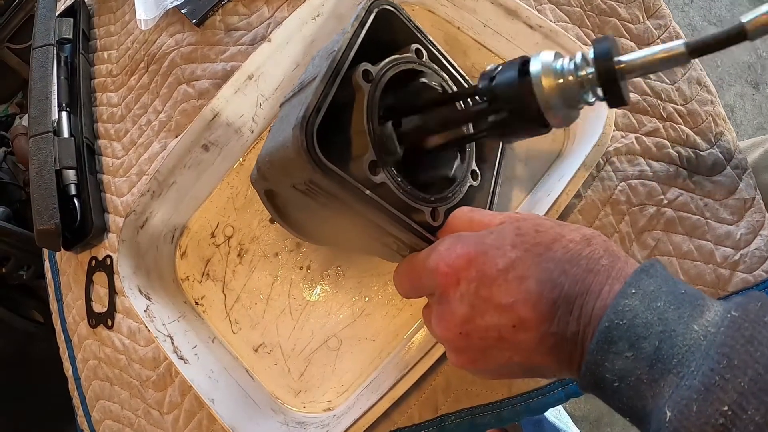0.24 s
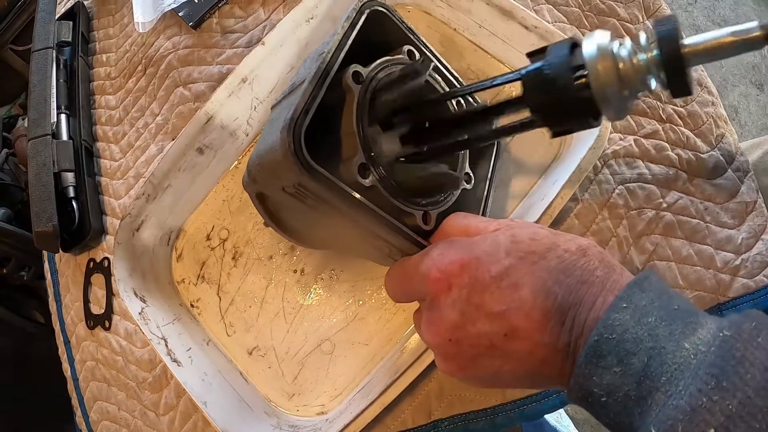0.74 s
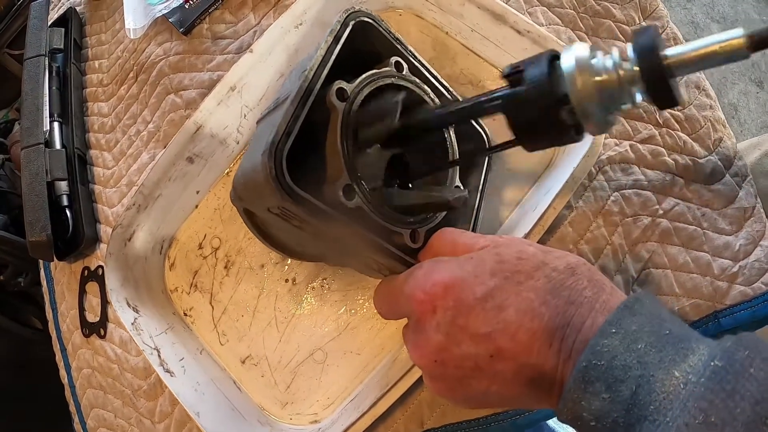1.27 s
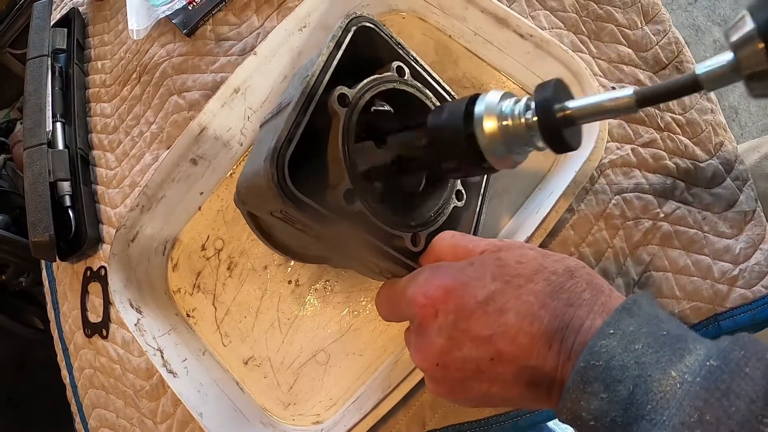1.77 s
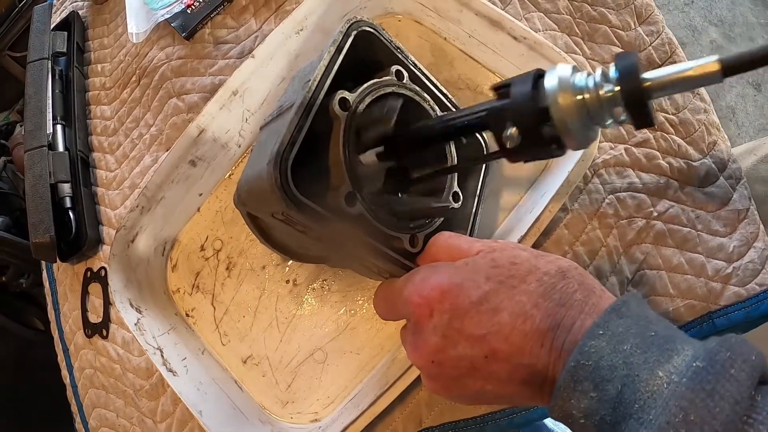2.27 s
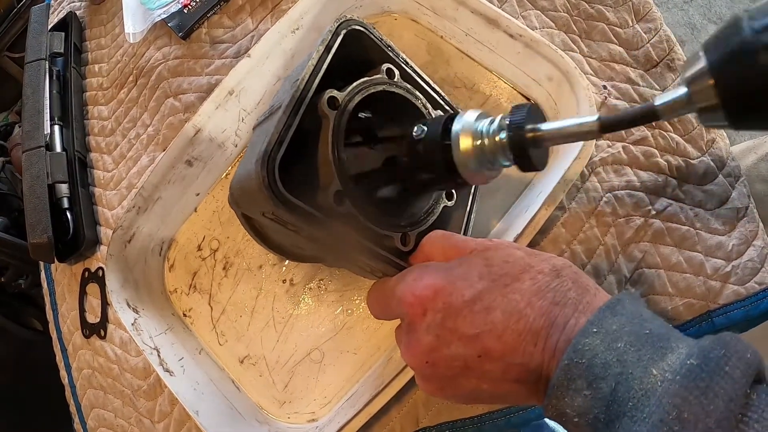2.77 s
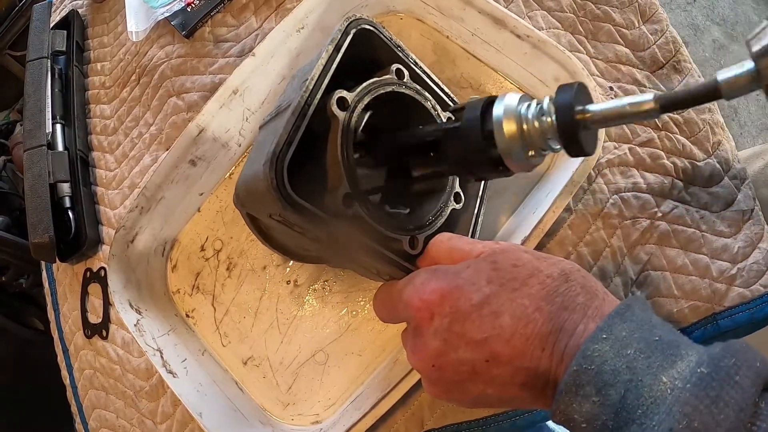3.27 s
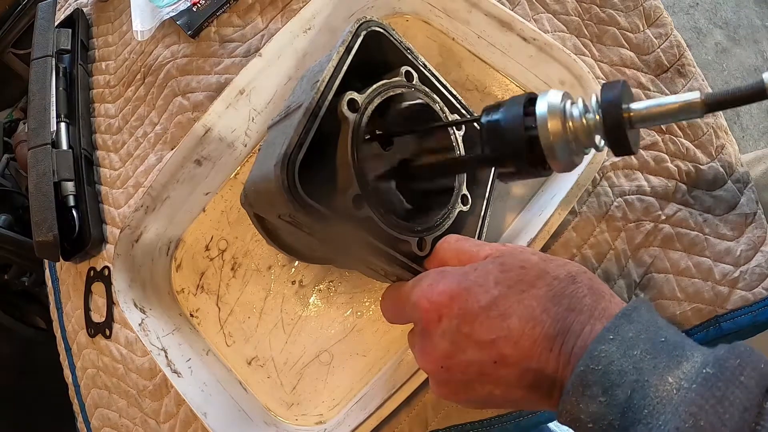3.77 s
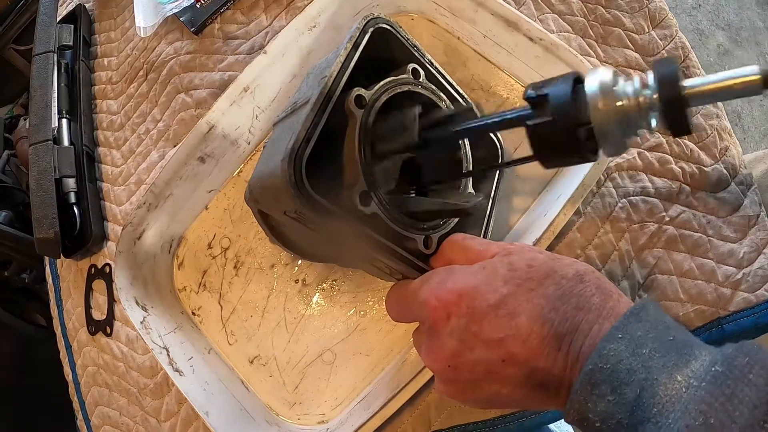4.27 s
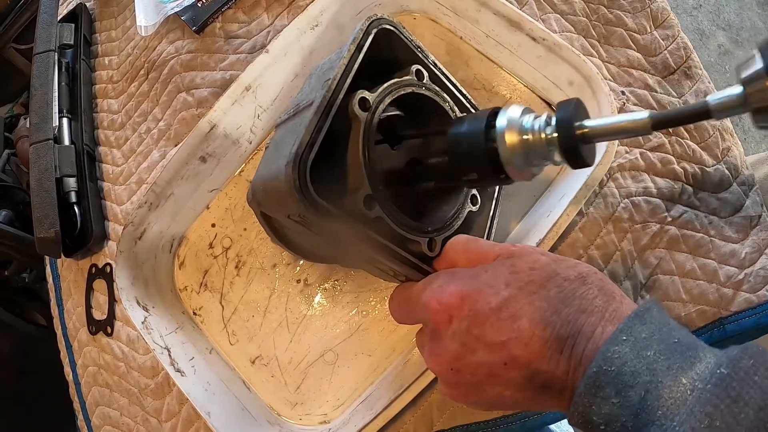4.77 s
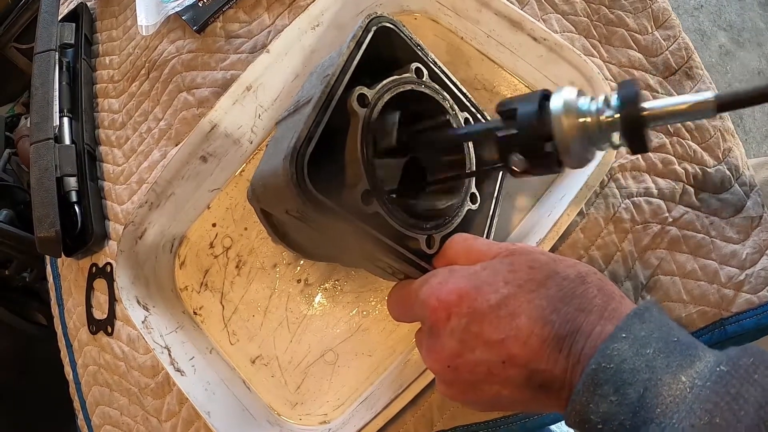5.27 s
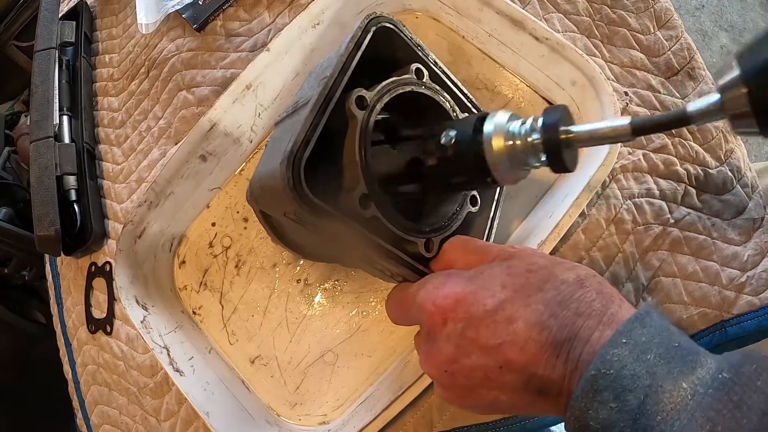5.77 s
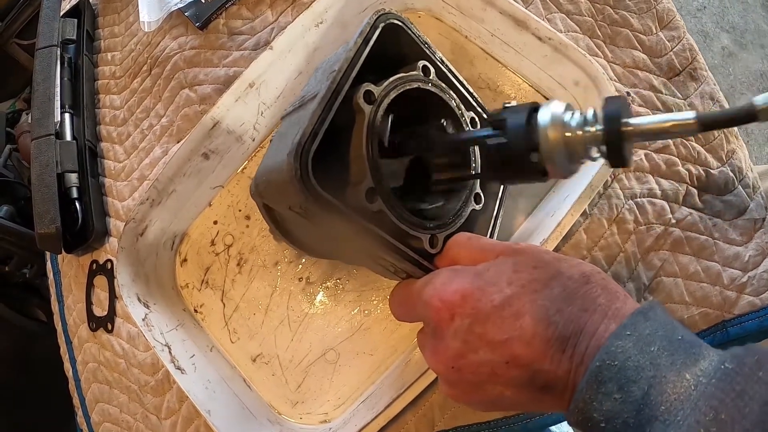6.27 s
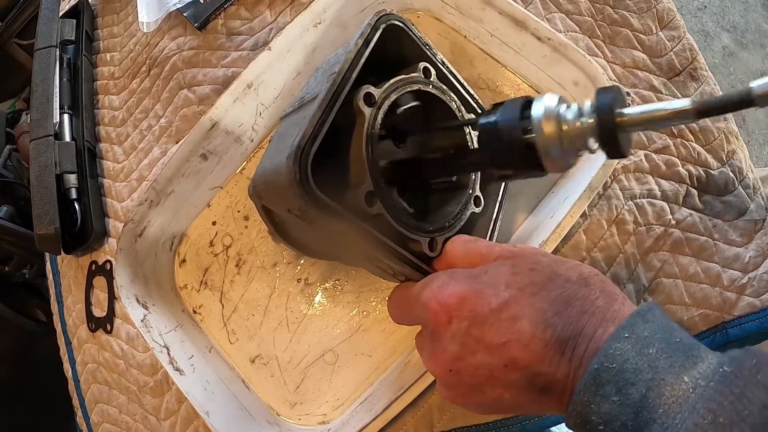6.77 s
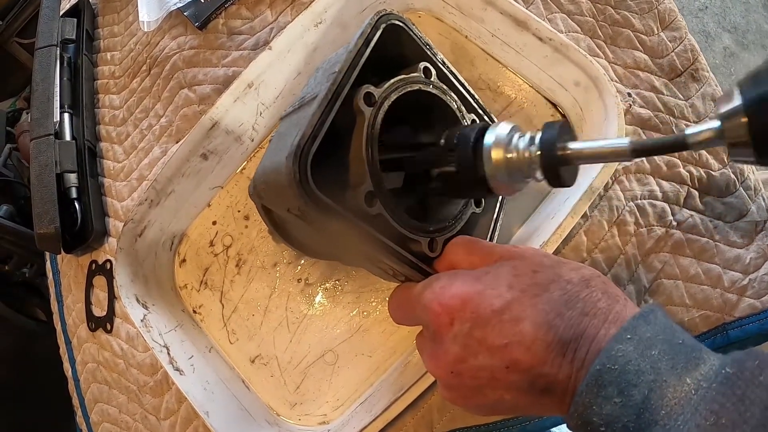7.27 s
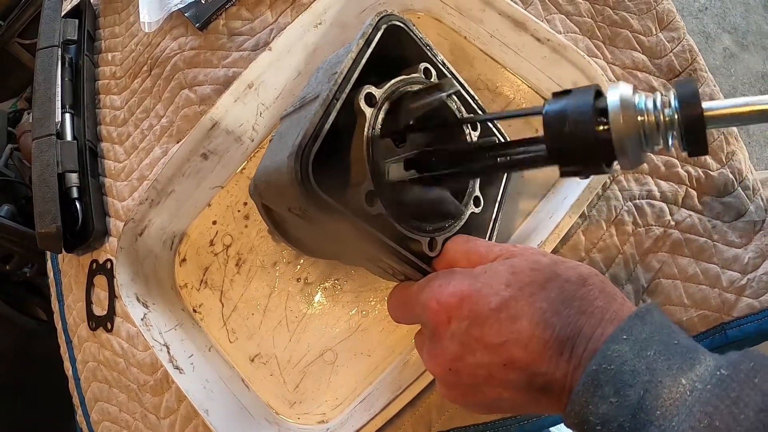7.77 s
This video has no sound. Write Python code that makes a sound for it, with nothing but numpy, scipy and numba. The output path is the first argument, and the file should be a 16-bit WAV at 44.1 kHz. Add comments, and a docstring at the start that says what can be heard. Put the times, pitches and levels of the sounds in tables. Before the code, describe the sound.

Close up in a workshop, a drill-driven three-stone hone grinds inside a metal cylinder. Gritty hiss and scratches flutter about forty times a second above a low shuddering hum, swelling with each stroke. Irregular bright clacks ring the casting, densest around three seconds and near seven. Dull knocks on the plastic tray come late. Airy motor whirr sits slightly right; the sound opens from near mono to stereo.

```python
"""A gritty hiss chatters and pulses over a low shake, with hard clacks, dull knocks and a whirr to the right.
A drill spins a three-stone hone up and down a ported cylinder held in a plastic tray: noise and short scrapes
make the hiss and ring the casting, and each stone crossing the ports shakes the bench. Short scrapes make the
clacks, fading tones and noise the knocks, coloured noise the drill and its cooling air, and a sine a faint hum.
The stereo picture opens from almost mono, and an automatic level control ducks the sound after loud peaks."""
import sys
import numpy as np
from scipy import signal
from scipy.fft import rfft, irfft, next_fast_len
from scipy.io import wavfile
from scipy.ndimage import uniform_filter1d, map_coordinates
from numba import njit

SR = 44100
rng = np.random.default_rng(int(sys.argv[2]) if len(sys.argv) > 2 else 0)


def persist_wave(psi):
    """Save psi, clipped to +-1, as 16-bit WAV."""
    counts = np.round(np.clip(psi, -1, 1) * 32767).astype(np.int16)
    wavfile.write(sys.argv[1], SR, np.atleast_2d(counts).T)


N = 354104

# ways the casting rings: [f/Hz, basic width/Hz, basic level/dB within its group,
# group: 0 dull wall, 1 low, 2 middle, 3 high, 4 top]
CASTING_MODES = [(467, 23, -11, 0), (694, 127, -4, 0), (1251, 40, -18, 0), (1528, 12, -16.5, 0),
                 (2045, 52, -5, 1), (2628, 39.4, 1, 1), (3180, 140, -4, 2), (3580, 100, -3.5, 2),
                 (3640, 42, 0.5, 2), (4200, 120, -7.5, 3), (4550, 30, -9, 3), (4920, 120, -5, 3),
                 (5100, 91, -10.5, 3), (6040, 110, -4.5, 4), (5820, 130, 2, 4)]


def undb(db):
    """Turn dB into a gain factor."""
    return 10 ** (np.asarray(db) / 20)


def level(x, db):
    """Scale a sound to an rms level in dB."""
    return x * undb(db) / np.sqrt(np.mean(x ** 2))


def curves(table):
    """Read each column of a (t/s, ...) table at every sample, with straight lines between rows."""
    s, *columns = np.transpose(table)
    return [np.interp(np.arange(N) / SR, s, column) for column in columns]


def at_hz(table, hz):
    """Read a (f/Hz, value) table on a logarithmic frequency axis."""
    f, value = np.transpose(table)
    return np.interp(np.log(np.maximum(hz, 1)), np.log(f), value)


def colour(x, table):
    """Make pitch regions louder or softer as a (f/Hz, gain/dB) table says."""
    size = next_fast_len(N)
    gain = undb(at_hz(table, np.fft.rfftfreq(size, 1 / SR)))
    return irfft(rfft(x, size) * gain, size)[..., :N]


def bandpass(x, order, low_hz, high_hz):
    """Keep only the sound between two frequencies."""
    return signal.sosfilt(signal.butter(order, [low_hz, high_hz], "band", fs=SR, output="sos"), x)


def mode(x, hz, width_hz):
    """Ring one fixed pitch; a wider mode dies away faster."""
    r, w = np.exp(-np.pi * width_hz / SR), 2 * np.pi * hz / SR
    return signal.lfilter([0, np.sin(w)], [1, -2 * r * np.cos(w), r * r], x)


def drifting(x, hz, width_hz):
    """Ring one mode whose pitch moves from sample to sample."""
    spin = np.exp(2j * np.pi * np.cumsum(hz) / SR)
    ringing = signal.lfilter([1], [1, -np.exp(-np.pi * width_hz / SR)], x / spin)
    return (ringing * spin).imag


def walk(rate):
    """Wander at random: draw `rate` values a second and smooth the steps twice; spread near 1."""
    k = int(SR / rate)
    steps = np.repeat(rng.standard_normal(N // k + 1), k)
    return 1.3 * uniform_filter1d(uniform_filter1d(steps, k), k)[:N]


def chatter(turn, per_s, scatter_db, focus, lag, ms):
    """Grit catches in short noisy scrapes of uneven size, bunched once per stone passage."""
    chance = per_s / SR * np.exp(focus * np.cos(turn - lag)) / np.i0(focus)
    hit = rng.random(N) < chance
    size = np.minimum(rng.exponential(size=N), 3.)
    fade = np.exp(-1000 / (ms * SR))
    loudness = signal.lfilter([1], [1, -fade], hit * undb(scatter_db * size))
    return level(loudness * rng.standard_normal(N), 0)


def stone_hiss(turn, rattle_db, high_db, skip_db):
    """Stones hiss and chatter in overlapping half-octave bands that flicker each on their own."""
    # basic colour of the hiss: [f/Hz, relative level/dB per Hz]
    grit_colour = [(45, -15), (90, -20.5), (140, -22.5), (220, -63), (330, -24.5), (480, -19), (900, -17),
                   (1400, -13.5), (2300, -14), (3100, -15.5), (5000, -14.5), (6800, -25.5), (8700, -27.5),
                   (11000, -39), (15600, -83)]
    tray_hiss_db, bright_hiss_db = 12.5, 6  # added to the tray rattle and to the high ring
    size = next_fast_len(N)
    hz = np.fft.rfftfreq(size, 1 / SR)
    shape = undb(at_hz(grit_colour, hz))
    grains = chatter(turn, 150., 0.79, 0.72, -0.84, 2.1)
    hiss = rfft(rng.standard_normal(N), size) * shape
    grit = rfft(grains, size) * shape
    out, shared = 0, walk(35.)
    for step in np.arange(0, 9, .5):
        centre = 50 * 2 ** step
        octaves_off = np.log2(np.maximum(hz, 1) / centre)
        band = np.cos(np.pi * np.clip(octaves_off, -.5, .5)) ** 2
        db, grainy = 1.06 * shared + 1.9 * walk(45.), .3
        if centre < 1000:
            # the tray buzzes on both swings of the shake, and its share changes along the stroke
            db = db + rattle_db + tray_hiss_db - 3.5 * np.cos(2 * turn)
        if centre > 3000:
            db = db + (high_db + bright_hiss_db + skip_db) * (centre < 7000)
            grainy = .7
        out = out + undb(db) * irfft((hiss + grainy * grit) * band, size)[:N]
    return level(out, -2)


def scratches(turn):
    """Single sharp scratches stand out of the hiss as scattered bursts of grit noise."""
    bursts = chatter(turn, 55, 4.0, 1.2, -.7, 0.79)
    tone = [(400, -27), (1300, -6), (3000, -1), (5500, -2), (8000, -13.5), (14000, -28)]  # f/Hz, gain/dB
    return level(colour(bursts, tone), -14.5)


def ringing_casting(turn, rattle_db, ring_db, skip_db):
    """Grit rings the casting's modes, whose pitches drift as the stones press on the wall."""
    # how far the pitches of each mode group wander: [share of the pitch]
    wander = (0.0081, 0.0082, 0.0095, 0.0294, 0.0088)
    # each group of modes is driven from its own patch of the bore
    patches = [chatter(turn, 160., 2.8, 0.92, -.6 * group, 0.96) for group in range(5)]
    patch_strength = [0.84, 1.13, 0.74, 1.4, 1.3]
    out = 0
    for k, (f, width, db, group) in enumerate(CASTING_MODES):
        # not every mode answers the same stone passage
        delay = (k % 3) * int(SR / 39.5)
        push = rng.standard_normal(N) + patch_strength[group] * np.roll(patches[group], delay)
        push = push * undb(2.2 * walk(35.) + (group > 1) * skip_db)
        ring = level(drifting(push, f * (1 + wander[group] * walk(16.)), width), 0)
        group_db = [(f < 1000) * rattle_db, *ring_db][group]
        out = out + undb(db + group_db) * ring
    return out


def grind(turn, rattle_db, ring_db):
    """Stones grip and skip, so the bright scrape swells and gaps along with the hiss and ringing."""
    skip_db = 1 * walk(99)
    return (stone_hiss(turn, rattle_db, ring_db[2], skip_db) + scratches(turn)
            + ringing_casting(turn, rattle_db, ring_db, skip_db))


def clacks():
    """A stone catches hard on a port edge: a short scrape rings modes near its pitch and cracks in the treble."""
    # hard catches: [t/s, ring peak/dB before the final colour, pitch/Hz, treble crack/dB compared with the ring]
    catches = [(0.038,-7.5,2653,-17), (0.111,-11.5,2640,-28), (0.539,-9,3540,-28), (0.644,-9,3600,-23),
               (0.66,-7.5,4940,-25), (0.685,-24,4600,-20), (0.737,-18,4970,-20), (0.7683,-9.5,3570,-27),
               (0.805,-8.5,4970,-11), (0.928,-16,5500,-16), (1.008,-20,2640,-24), (1.074,-10,3720,-22),
               (1.098,-14,3800,-18), (1.0977,-16.5,2670,-24), (1.16,-17,2610,-24), (1.197,-15,3610,-24),
               (1.216,-9.5,3600,-23), (1.159,-16,4800,-10), (1.51,-15,5000,-12), (1.608,-11,3580,-18),
               (1.634,-12.5,4800,-8), (2.01,-11,3700,-11), (2.03,-5.5,2590,-26), (2.489,-7.5,4040,-10),
               (2.495,-15,2600,-24), (2.510,-9.5,4600,-20), (2.515,-11,3600,-22), (2.535,-10,4700,-14),
               (2.569,-21,2640,-13), (2.578,-11,4700,-20), (2.596,-17,5800,-20), (2.685,-17,4300,-14),
               (2.8836,-13.5,2623,-3), (2.9931,-14,2655,-6), (3.0255,-17,5730,-8), (3.040,-23,5800,12.5),
               (3.072,-23,5100,15), (3.081,-7.5,4550,-18), (3.0796,-1.5,3560,-24), (2.98,-10.5,5100,-18),
               (3.1,-13.5,2690,-3), (3.158,-15,4480,-16), (3.7085,-18,4670,-15), (4.195,-9,4790,-16),
               (4.216,-5,4700,-18), (4.223,-15,4860,7.5), (4.247,-7.5,3660,2.5), (4.614,-8,2622,-27.5),
               (4.94,-16,2640,-24), (4.875,-11.5,2620,-22), (5.0279,-8.5,4760,-15), (5.052,-10,4960,-24),
               (5.145,-8.5,4880,-17), (5.253,-14,4200,-15), (5.457,-11.5,2620,-10), (5.642,-8,3700,-20),
               (5.724,-11.5,2620,-21), (5.768,-12,2660,-24), (5.785,-6,4480,-18), (5.7925,-5.5,3670,-20),
               (5.7957,-9,4650,-20), (5.877,-8.5,2640,-9), (5.887,-13,2600,-24), (6.106,-6,4680,-25),
               (6.2591,-10,3600,-24), (6.455,-5.5,2600,-24), (6.587,-12.5,2690,-16), (6.625,-5,2653,-5),
               (6.66,-10,4720,-20.5), (6.6646,-1,4430,-15), (6.6728,-1,3880,-15), (6.690,-7.5,4200,3),
               (6.692,-11,2690,-24), (6.736,-16.5,2650,-12), (6.972,-9.5,3760,-19.5), (7.0823,-11,5060,-24),
               (7.115,-13,3640,-18), (7.125,-10,4560,-25), (7.451,-15.5,2620,-20), (7.5356,-12.5,3650,-18),
               (7.604,-16.5,2630,-24), (7.65,-16,3640,-26), (7.725,-11,4200,-20), (7.79,-19,3660,-24),
               (7.815,-17,3640,-20), (7.862,-12.5,4500,-14), (7.926,-17,3620,-24), (7.974,-5.5,4860,-20),
               (7.976,-10,3670,-24), (8,-5.5,4660,2)]
    scrape_cycles, low_drag = 10.2, 1.03  # drag time in cycles of the pitch; stretch of it below 3000 Hz
    squeal = 0.38  # strength of the even stick-slip tone beside the noise
    snap_s, snap_db, snap_fade_s = .0018, 0.5, 0.00099  # the stone snaps free after a short drag
    off_pitch_db = -51  # per octave between a mode and the catch's pitch
    t = np.arange(4096) / SR
    s, peak_db, pitch_hz, crack_db = np.transpose(catches)
    drag_s = scrape_cycles / pitch_hz * np.where(pitch_hz < 3000, low_drag, 1)
    drag = t / drag_s[:, None]
    noise = rng.standard_normal((len(s), len(t)))
    rub = noise + squeal * np.sin(2 * np.pi * pitch_hz[:, None] * t)
    scrape = rub * (1 - np.exp(-1.5 * drag)) ** 2 * np.exp(-drag)
    scrape = scrape + rub * (t > snap_s) * undb(snap_db) * np.exp(-(t - snap_s) / snap_fade_s)

    def peak(x):
        """Scale each catch to a peak of 1."""
        return x / np.abs(x).max(1)[:, None]

    ring = 0
    for f, width, db, group in CASTING_MODES:
        if group:  # the dull wall stays out
            gain = undb(off_pitch_db * np.abs(np.log2(f / pitch_hz)) + 0.3 * db)
            ring = ring + gain[:, None] * peak(mode(scrape, f, (.85 if group == 1 else 1.8) * width))
    crack = bandpass(noise * np.exp(-t / 0.0017), 3, 6500, 14000)
    sounds = undb(peak_db)[:, None] * (peak(ring) + undb(crack_db)[:, None] * peak(crack))
    out = np.zeros(N + len(t))
    for start, one in zip(s, sounds):
        i = int(start * SR)
        out[i:i + len(t)] += one
    return colour(out[:N], [(600, -6), (2000, -8.0), (9000, 5.5), (15000, -21)])


def knocks():
    """The casting knocks on the tray: a soft low thud, the tray's short lumpy ring and a little rattle."""
    # blows, in two groups: [t/s, relative thud level/dB, thud f/Hz, relative tray level/dB]
    blows = [(5.702, -26, 101, -14.5), (5.715, -12.5, 89, -28), (5.733, -28, 110, -32),
             (5.75, -30, 120, -21), (6.556, -32, 98, -19), (6.569, -16.5, 90.5, -19.5),
             (6.591, -13.5, 98, -26), (6.61, -26, 100, -22.5), (6.632, -28, 110, -36),
             (6.691, -24, 120, -20)]
    out = np.zeros(N)
    t = np.arange(SR // 5) / SR
    rough = bandpass(rng.standard_normal((len(blows), len(t))), 2, 300, 1900)
    for (s, thud_db, hz, tray_db), noise in zip(blows, rough):
        thud = np.sin(2 * np.pi * hz * t) * t / 0.011 * np.exp(1 - t / 0.0059)
        tray = np.sin(2 * np.pi * 395 * t) * np.exp(-t / 0.0037)
        tray = tray + 0.2 * np.sin(2 * np.pi * 290 * t) * np.exp(-t / 0.0091)
        rattle = 1.5 * noise * np.exp(-t / 0.0094)
        i = int(s * SR)
        out[i:i + len(t)] -= undb(thud_db) * thud + undb(tray_db) * (tray + rattle)
    return out


def stroke():
    """The shake changes along each stroke, since the hone slides lightly half-way between two turns."""
    # turns of the hand, bottom and top in turn: [t/s, basic shake level/dB]
    hand_turns = [(0.07, -26), (0.7, -32), (1.14, -25), (1.58, -31.5), (2.0, -24), (2.53, -33.5),
                  (2.99, -23), (3.33, -39), (3.68, -29.5), (4.2, -30), (4.7, -27.5), (5.15, -29.5),
                  (5.66, -28.5), (6.12, -30.5), (6.58, -28.5), (7.0, -32.5), (7.45, -29.5), (7.95, -29.5)]
    midway_db = -1
    half_strokes = np.interp(np.arange(N) / SR, np.transpose(hand_turns)[0], np.arange(len(hand_turns)))
    return curves(hand_turns)[0] + midway_db * np.sin(np.pi * half_strokes) ** 2


def bench_shake(turn, dip_db, drop_db):
    """Each stone crossing the ports shakes the bench: a low tone with two weak, wavering overtones."""
    shake_db = stroke() + drop_db + 1.3 * dip_db + 1.9 * walk(9.0)
    swing = np.cos(turn) + 0.048 * np.cos(2 * turn + walk(7.9)) + 0.026 * np.cos(3 * turn + walk(21.0))
    return np.sqrt(2) * undb(shake_db) * swing


def drill(turn, grind_db, flicker):
    """Motor and gear noise, partly diffuse and nearer the right microphone, grows as the stones load the drill."""
    # basic loudness of the drill: [t/s, level/dB]
    drill_level = [(0, -43), (1.6, -39), (3, -36), (5, -33.5), (6.5, -31.5), (8.03, -33)]
    # colour of the gear noise: [f/Hz, relative level/dB per Hz]
    gear_colour = [(300, -42), (1500, -13), (3500, -7), (6000, 10.5), (7500, 0.5), (8500, 13), (10000, 4),
                   (12000, -9), (15700, -19)]
    direct, *diffuse = rng.standard_normal((3, N))
    air = level(colour(1.3 * direct + np.array(diffuse), gear_colour), 0)
    wavering_db = .7 * walk(22.0) + 1.0 * walk(50.)
    # it throbs as each stone crosses the ports
    load_db = .6 * (grind_db + 22.0) + 0.92 * np.cos(turn + 1.9)
    return air * undb(curves(drill_level)[0] + wavering_db + load_db) * flicker * undb([[-2.5], [2.5]])


def fan(turn, dip_db, flicker):
    """The motor's cooling air hisses all round, a little more to the right; its bands flutter separately."""
    # basic colour of the air: [f/Hz, relative level/dB per Hz]
    air_colour = [(2000, -43), (5000, -24), (7000, 12.5), (10000, -22), (12000, 1.5), (15700, -13)]
    air, out = colour(rng.standard_normal((2, N)), air_colour), 0
    for low_hz, high_hz in [(1000, 7000), (7000, 9000), (9000, 11500), (11500, 16500)]:
        band_filter = signal.butter(2, [low_hz, high_hz], "band", fs=SR, output="sos")
        band = signal.sosfiltfilt(band_filter, air)
        out = out + band * undb(0.26 * walk(40.) + 1.6 * walk(110.))
    throb_db = 0.74 * dip_db + 0.37 * np.cos(turn + .8)
    return level(out, -43) * undb(throb_db) * flicker * undb([[-1.6], [1.6]])


def hum():
    """A faint sine tone glides upward and fades."""
    # path of the tone: [t/s, f/Hz, peak level/dB]
    glide = [(5.1, 87, -78), (5.3, 88.6, -49), (5.9, 96.8, -41.5), (6.35, 103, -53), (6.6, 104, -54),
             (6.9, 104, -78)]
    hum_hz, hum_db = curves(glide)
    return undb(hum_db) * np.sin(2 * np.pi * np.cumsum(hum_hz) / SR)


def lulls():
    """After some hard catches the level dips quickly and the bass changes more slowly; both are given in dB."""
    # [t/s, basic dip/dB, basic bass change/dB, length of the bass change/s]
    dips = [(3.098, -8.5, -27, 0.36), (5.797, -2, 3, 0.075), (6.7, -2, -10, 0.22), (8.001, -5, 5, 0.11)]
    fall_s, recover_s, bass_late_s = 0.022, 0.04, 0.029
    s, dip_db, drop_db, out_s = np.transpose(dips)[:, :, None]
    since = np.arange(N) / SR - s
    dip = np.clip(since / fall_s, 0, 1) * np.exp(-np.maximum(since - fall_s, 0) / recover_s)
    drop = np.sin(np.pi * np.clip((since - bass_late_s) / out_s, 0, 1))
    return np.sum(dip_db * dip, 0), np.sum(drop_db * drop, 0)


def spread(x, pan_db, lag_ms):
    """Reflections reach two microphones differently: the deep bass is alike, the treble less so."""
    # likeness of left and right: [f/Hz, correlation from 0 to 1]
    likeness = [(40, .9993), (80, 1), (150, 0.93), (400, 0.96), (1000, 0.98), (3000, 0.96), (7000, 0.68),
                (15000, 0.75)]
    t = np.arange(16384) / SR
    nearby = rng.standard_normal(len(t)) * np.exp(-t / .1)
    echoes = signal.fftconvolve(x, nearby / np.sqrt(np.sum(nearby ** 2)))[:N]
    unlike = colour(echoes, [(f, 10 * np.log10(max(1 - c, 1e-4) / (1 + c))) for f, c in likeness])
    late = map_coordinates(x, [np.arange(N) - lag_ms * SR / 1000], order=5)
    return np.array([(late + unlike) * undb(pan_db / 2), (x - unlike) * undb(-pan_db / 2)])


def scene():
    """Mix hone, shaking bench, tray, drill, air and hum at two microphones."""
    # the grind along the strokes: [t/s, basic level/dB,
    # then compared with it: tray rattle/dB, low, middle, high and top ring/dB]
    grind_path = [(0.07, -26, -10, -2.5, -8, -6.5, -10), (0.22, -25, -12, -5.5, -12, -11.5, -16),
                  (0.38, -26, -11.5, -9.5, -7, -7.5, -13), (0.54, -24.5, -11, -8, -10, -10, -15),
                  (0.7, -24, -12.5, -3.5, -14, -5.5, -19), (0.79, -22, -13.5, -16, -7.5, -8, -16),
                  (0.92, -26.5, -12.5, -8, -11, -9.5, -11), (1.14, -24.5, -11.5, -3.5, -11, -5, -15),
                  (1.36, -25.5, -14.5, -13.5, -8.5, -8.5, -18), (1.58, -21, -14, -9.5, -13, -7, -29),
                  (1.7, -26, -12.5, -8.5, -9.0, -8.5, -18), (1.79, -27.5, -14, -9.5, -11, -7, -12),
                  (2.0, -23, -12, -5.5, -8.5, -7, -12), (2.28, -27.5, -13, -9, -9, -6.5, -14),
                  (2.43, -24, -18, -17, -13, -8.5, -20), (2.55, -22.5, -13, -8, -9.5, -6.5, -19),
                  (2.66, -24, -16, -10.5, -10, -7.5, -24), (2.77, -26, -13.5, -12, -9.5, -8, -14),
                  (2.99, -23.5, -11, -6.5, -9.5, -6.5, -9.5), (3.07, -23, -11, -4, -9.5, -11, -15),
                  (3.12, -26, -10, -18, -6, -6, -18), (3.16, -26.5, -6, -4, -13, -9.5, -16),
                  (3.33, -29, -17, -11.5, -12, -9.5, -18), (3.5, -27, -18.5, -12.5, -10, -10, -12),
                  (3.68, -24.5, -13.5, -5.5, -8, -5.5, -20), (3.81, -27, -15.0, -10, -11.5, -5, -15),
                  (3.94, -25, -17.5, -11, -6, -8.5, -10), (4.08, -23.5, -16, -16, -14.5, -9.5, -19),
                  (4.2, -23.5, -15, -9, -10, -5, -17), (4.32, -21.5, -14.5, -13, -13, -7.5, -22),
                  (4.45, -26, -18.5, -9, -8, -7.5, -18), (4.58, -26, -12.5, -4, -15, -4.5, -10),
                  (4.7, -24, -11, -4, -8.5, -3.5, -9.5), (4.82, -22.5, -14, -7.5, -13, -12, -18),
                  (4.93, -26.5, -17.5, -5.5, -11, -7, -10), (5.15, -25.5, -13.5, -12, -9.5, -4, -20),
                  (5.4, -25.5, -18, -9, -10, -6, -10), (5.66, -24.5, -10.5, -3.5, -12, -7.5, -13.5),
                  (5.78, -24, -8.5, -11, -13, -6, -14), (5.89, -26.5, -16, -2, -11.0, -5, -7),
                  (6.12, -26, -15, -17, -9, -6, -25), (6.35, -27, -16.5, -6.5, -14, -1, -7),
                  (6.58, -26.5, -12, -9.5, -10.5, -8, -10), (6.79, -27.5, -13, -5.5, -10, -7, -11),
                  (6.9, -29.5, -21, -18, -18, -4, -2), (7.0, -28.5, -16, -10.5, -16, -2, -33),
                  (7.22, -25, -21.5, -12, -10, -6.5, -5), (7.33, -27, -16, -3.5, -8, -9.5, -9),
                  (7.45, -23, -12.0, -9.5, -16, -8.5, -22), (7.58, -25.5, -14, -6.5, -13, -5.5, -16),
                  (7.7, -25, -26, -13, -10, -8, -11.5), (7.82, -24, -17.5, -17, -14, -7.5, -15),
                  (7.95, -27.5, -16.5, -8.5, -8.5, -4, -18)]
    # stones crossing the ports: [t/s, passages per s]
    passages = [(0, 38.97), (.35, 40.02), (.7, 41.73), (1.05, 39.44), (1.4, 38.96), (1.75, 42.39),
                (2.09, 37.51), (2.44, 40.34), (2.79, 39.84), (3.14, 39), (3.49, 39.21), (3.84, 37.95),
                (4.19, 40.67), (4.54, 39.94), (4.89, 39.3), (5.24, 38.95), (8.03, 39.05)]
    # the hone drifts to the right: [t/s, left minus right/dB, left lag/ms]
    hone_place = [(0, .1, 0), (1.5, .2, .012), (3, -.2, .025), (4, -.6, .04), (8.03, -1.1, .045)]
    grind_db, rattle_db, *ring_db = curves(grind_path)
    dip_db, drop_db = lulls()
    grind_db = grind_db + dip_db
    start_passage = .22  # share of a passage already gone at the start
    turn = 2 * np.pi * (np.cumsum(curves(passages)[0]) / SR + start_passage)
    # a small share of the bass change reaches the tray rattle
    stones = grind(turn, rattle_db + 0.17 * drop_db, ring_db)
    hone = undb(grind_db) * stones + clacks() + knocks()
    shake = bench_shake(turn, dip_db, drop_db) * undb([[.15], [-.15]])
    flicker = undb(1.4 * walk(90.))  # gear noise and cooling air waver together
    machine = drill(turn, grind_db, flicker) + fan(turn, dip_db, flicker)
    return spread(hone, *curves(hone_place)) + shake + machine + hum()


@njit
def follow(peak, attack, release):
    """Follow the peaks, with separate speeds for rise and fall."""
    out, e = np.empty(len(peak)), 0.
    for i in range(len(peak)):
        e += (peak[i] - e) * (attack if peak[i] > e else release)
        out[i] = e
    return out


def record(dry):
    """Open the stereo picture, duck a moment after loud peaks and cut the top."""
    # difference between each side and the middle: [t/s, gain/dB]
    width_gain = [(0, -66), (.22, -43), (.3, -16.5), (.9, -3.5), (2, 1.5), (3.2, 0.5), (8.03, 0.5)]
    middle = dry.mean(0)
    dry = middle + (dry - middle) * undb(curves(width_gain)[0])
    held = follow(np.abs(dry).max(0), 1 / (0.00053 * SR), 1 / (0.12 * SR))
    # above -12.53 dB, turn down by 0.8 dB for each dB too loud
    cut_db = -.8 * np.maximum(20 * np.log10(held + 1e-9) + 12.53, 0)
    duck_lag_s = .018
    slow = np.exp(-1 / (duck_lag_s * SR))
    ducked = dry * undb(signal.lfilter([1 - slow], [1, -slow], cut_db))
    top_hz = 15750
    return signal.sosfilt(signal.ellip(14, .2, 90, top_hz, fs=SR, output="sos"), ducked)


dry = scene()
out = record(dry)
persist_wave(out)
```